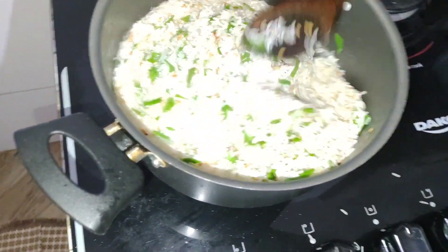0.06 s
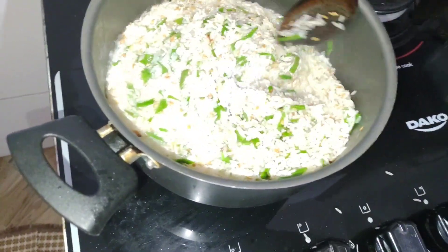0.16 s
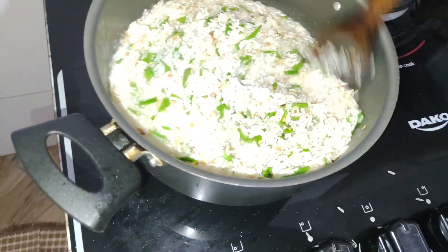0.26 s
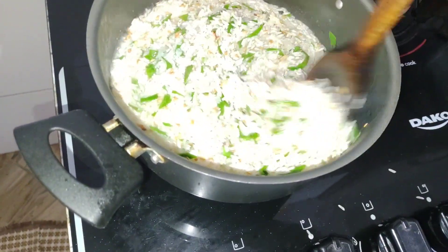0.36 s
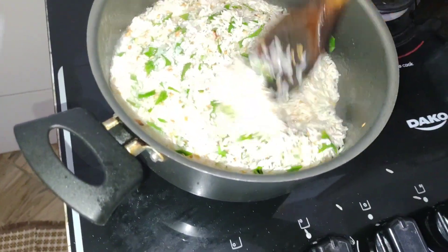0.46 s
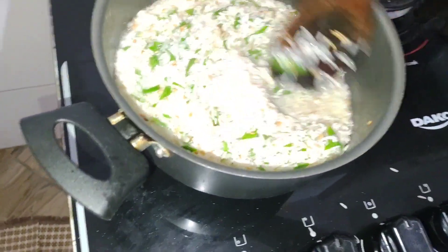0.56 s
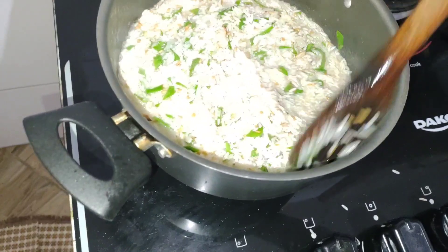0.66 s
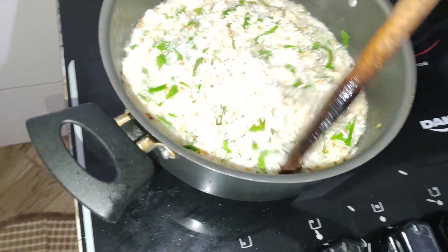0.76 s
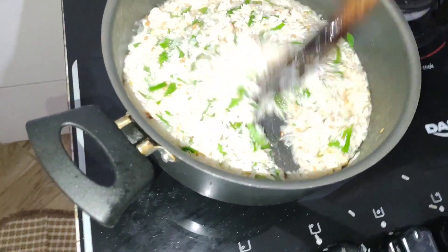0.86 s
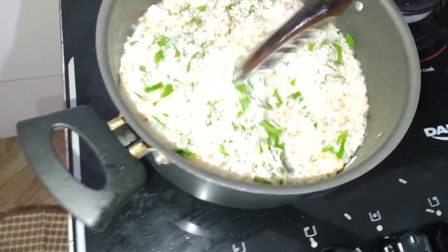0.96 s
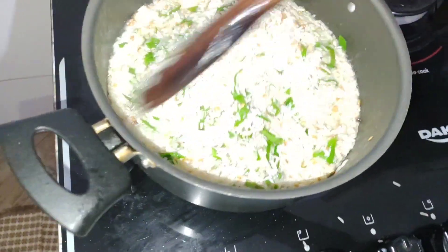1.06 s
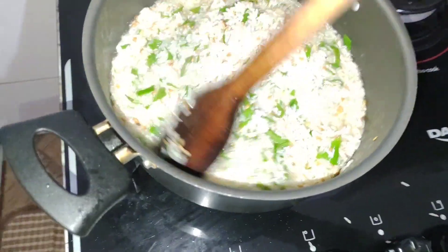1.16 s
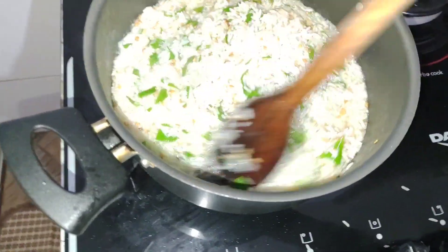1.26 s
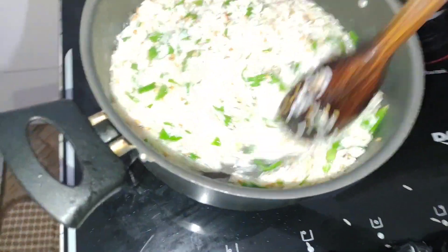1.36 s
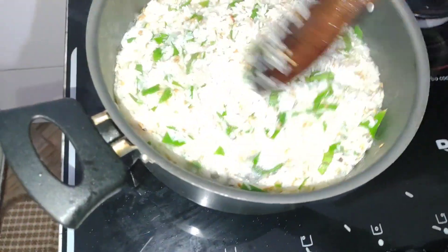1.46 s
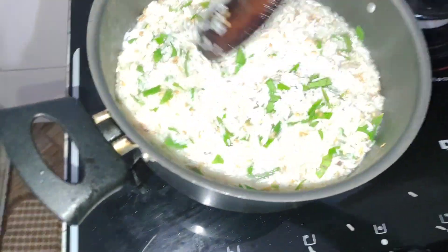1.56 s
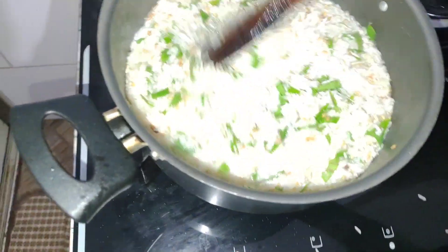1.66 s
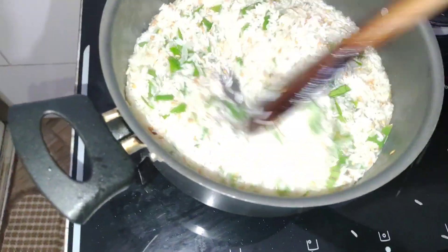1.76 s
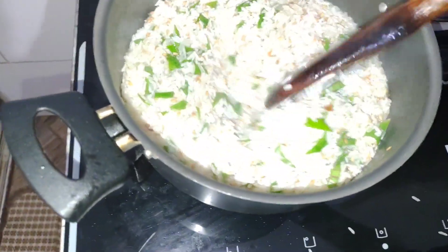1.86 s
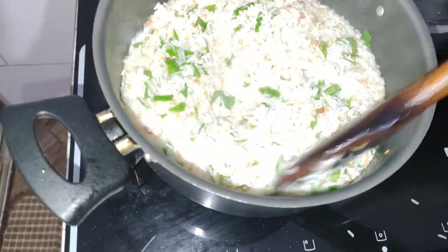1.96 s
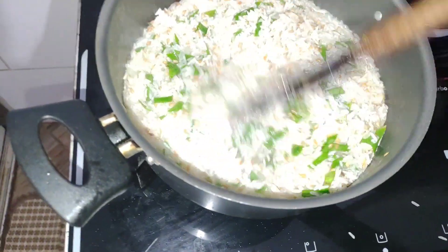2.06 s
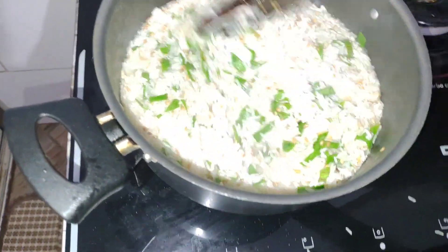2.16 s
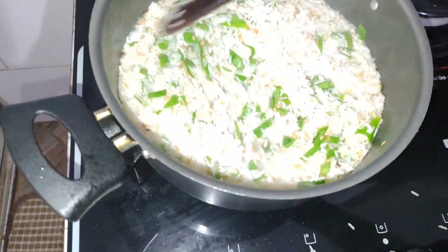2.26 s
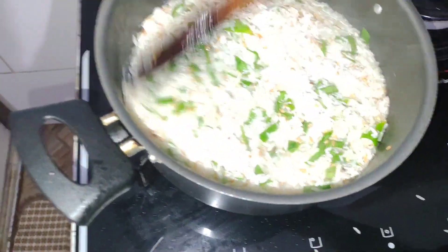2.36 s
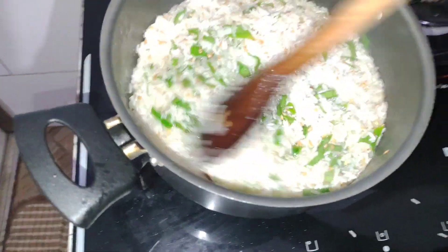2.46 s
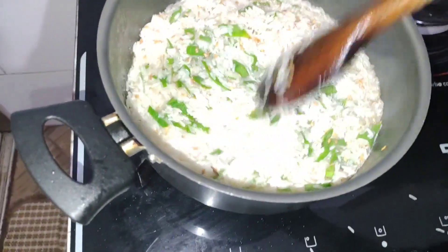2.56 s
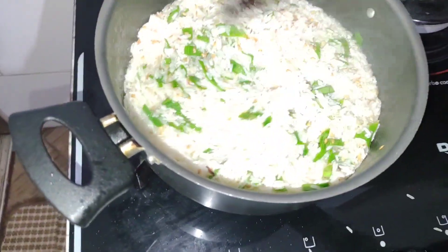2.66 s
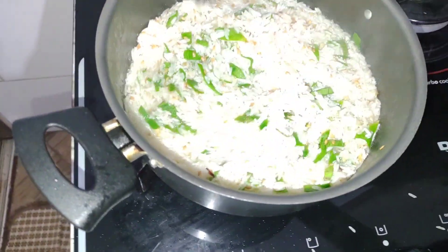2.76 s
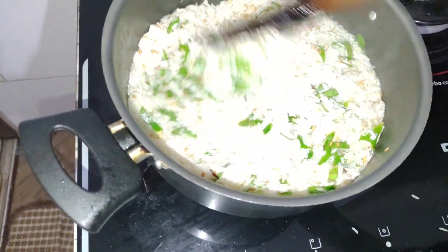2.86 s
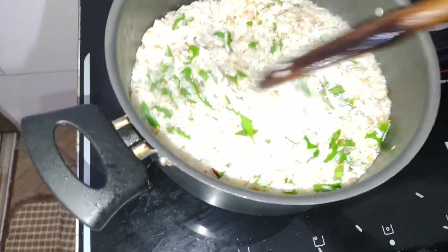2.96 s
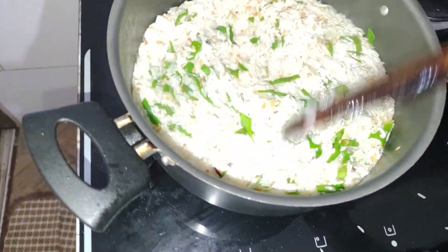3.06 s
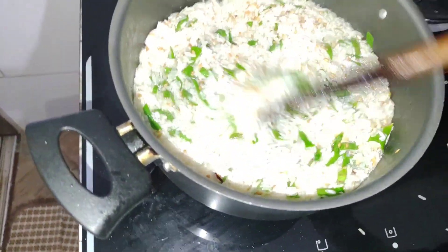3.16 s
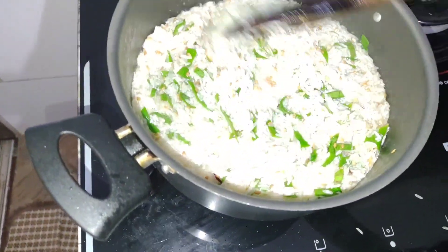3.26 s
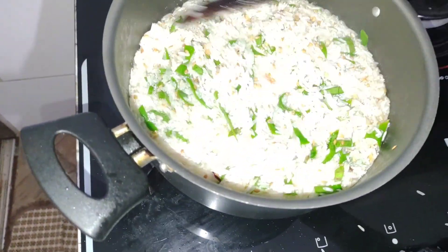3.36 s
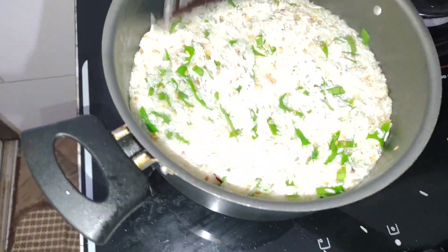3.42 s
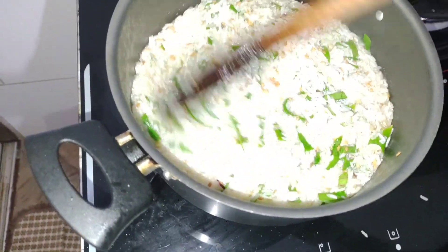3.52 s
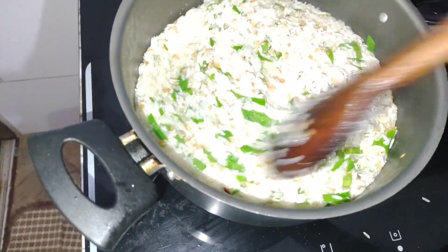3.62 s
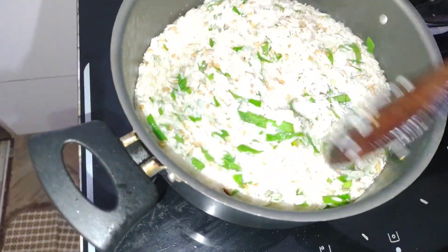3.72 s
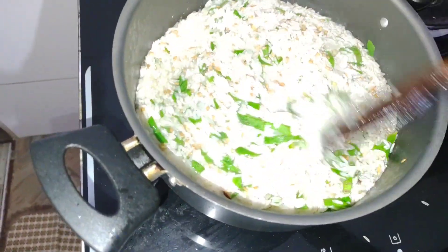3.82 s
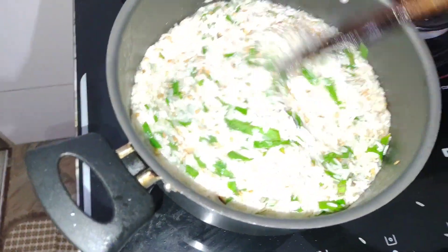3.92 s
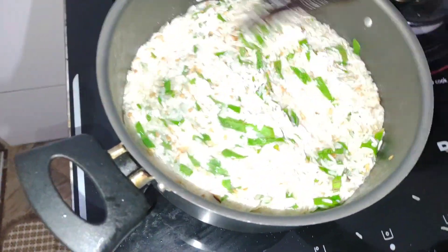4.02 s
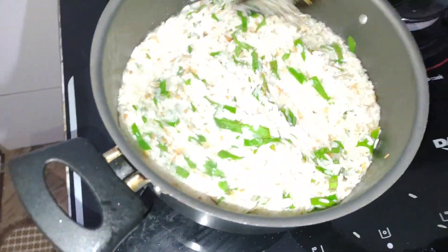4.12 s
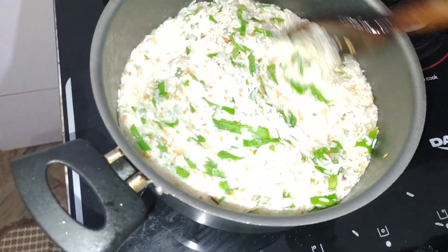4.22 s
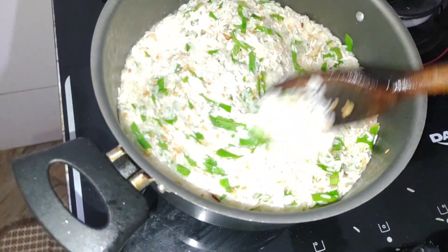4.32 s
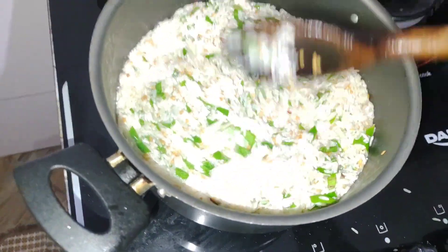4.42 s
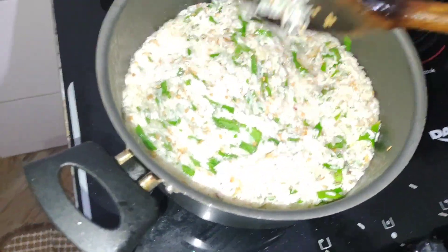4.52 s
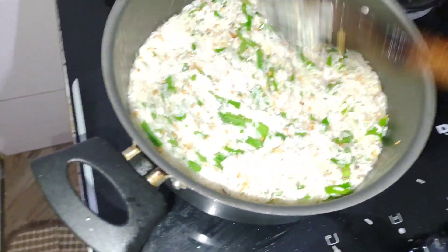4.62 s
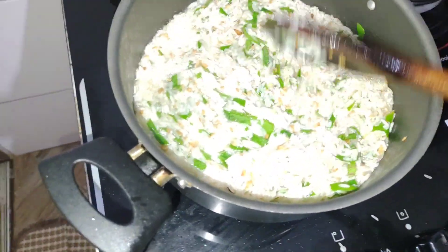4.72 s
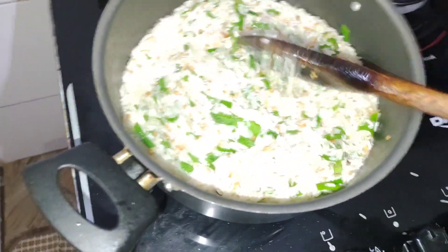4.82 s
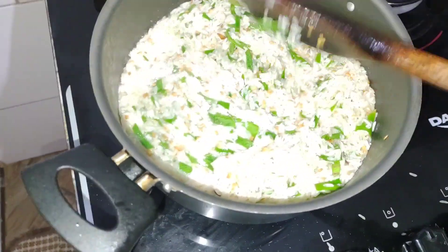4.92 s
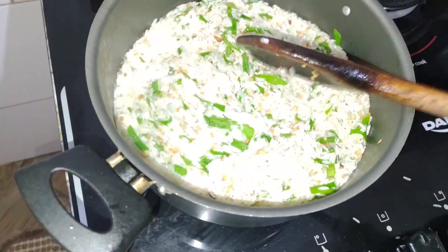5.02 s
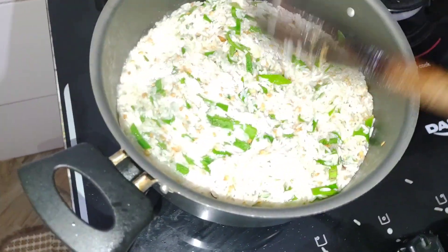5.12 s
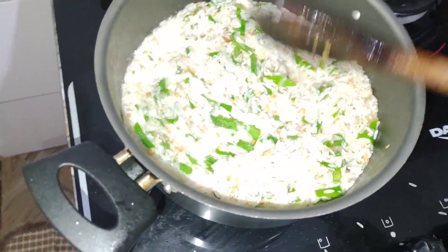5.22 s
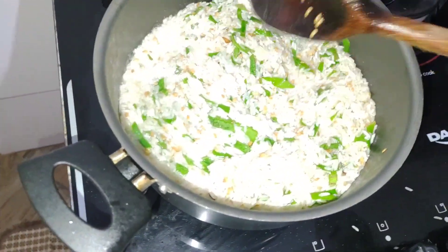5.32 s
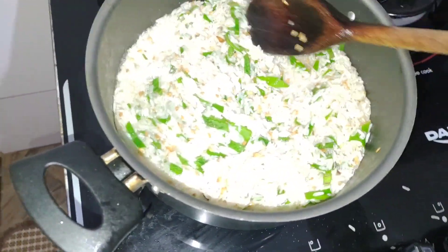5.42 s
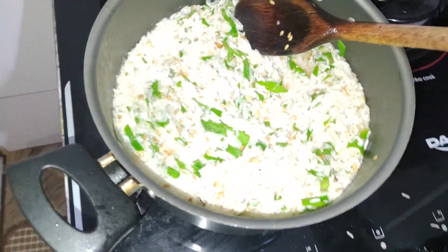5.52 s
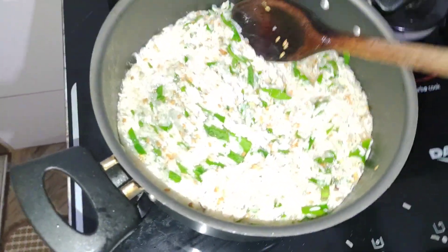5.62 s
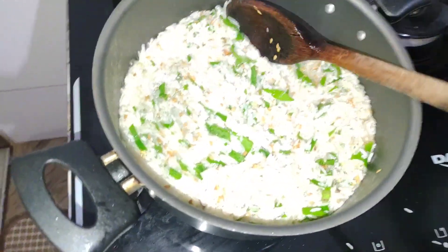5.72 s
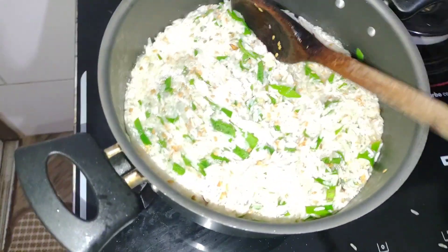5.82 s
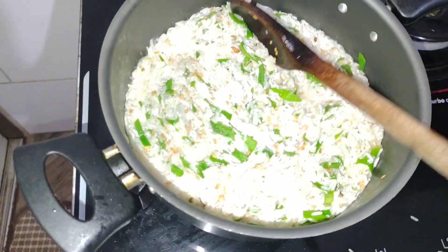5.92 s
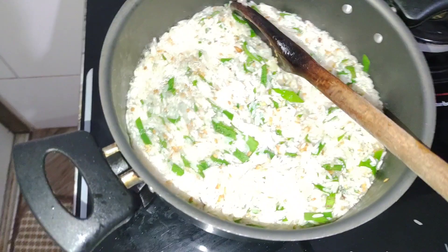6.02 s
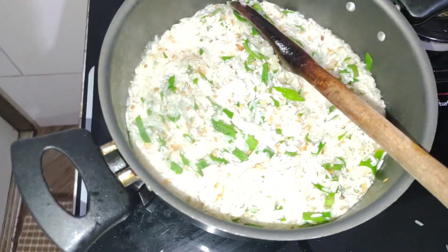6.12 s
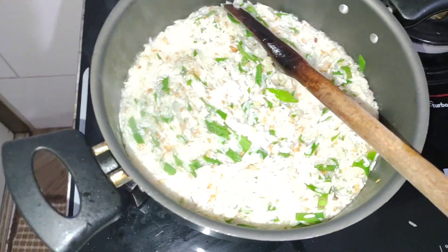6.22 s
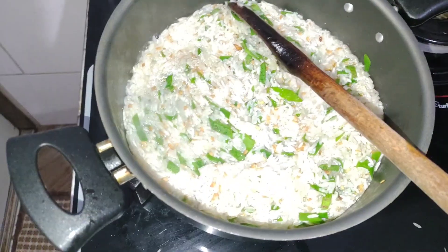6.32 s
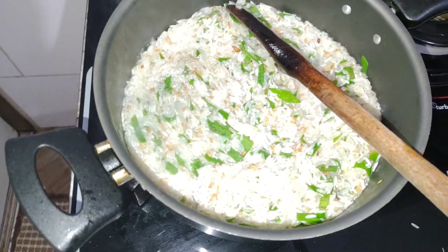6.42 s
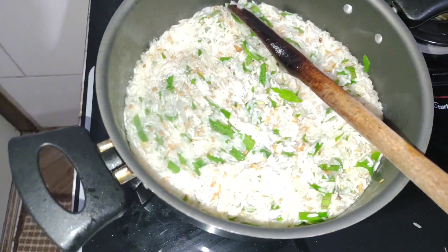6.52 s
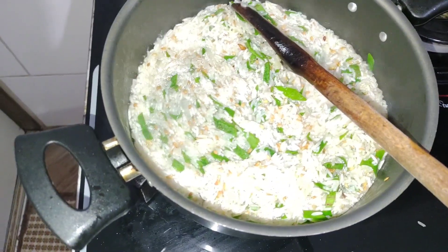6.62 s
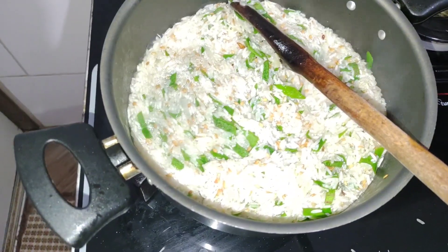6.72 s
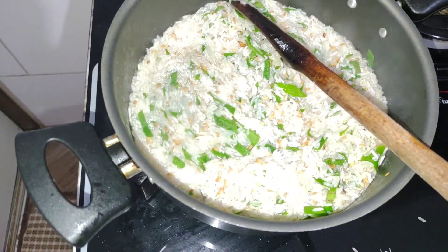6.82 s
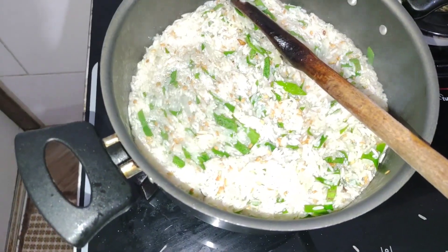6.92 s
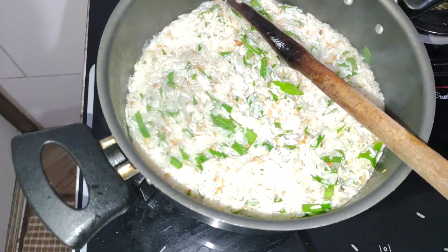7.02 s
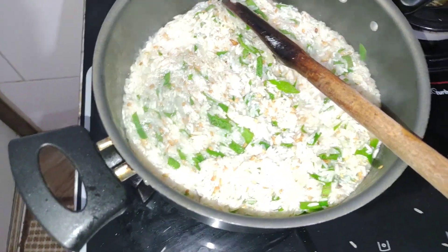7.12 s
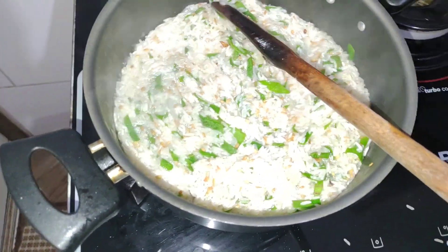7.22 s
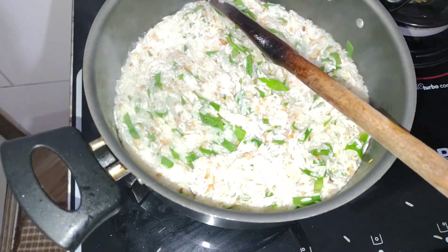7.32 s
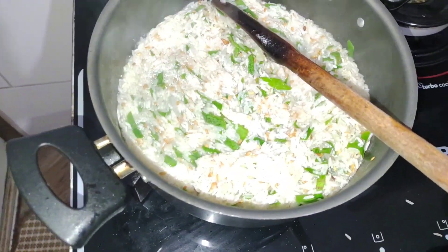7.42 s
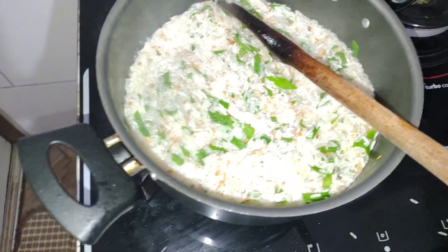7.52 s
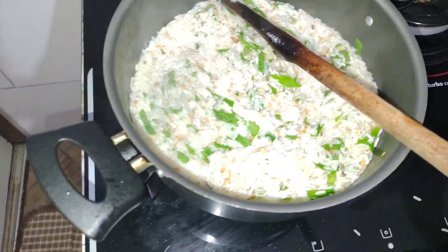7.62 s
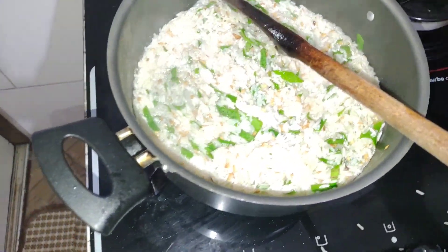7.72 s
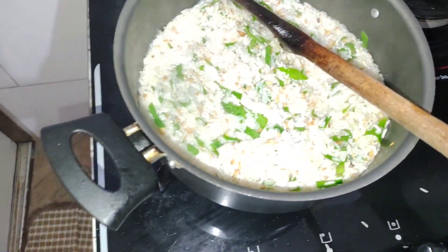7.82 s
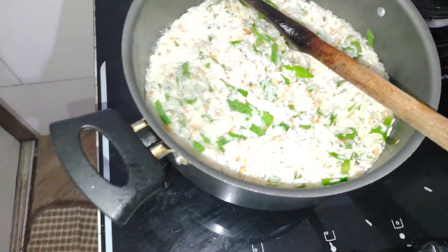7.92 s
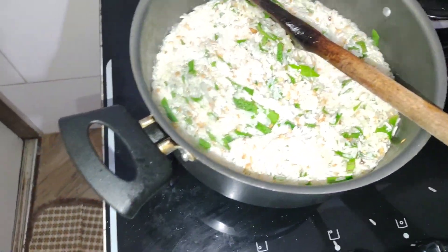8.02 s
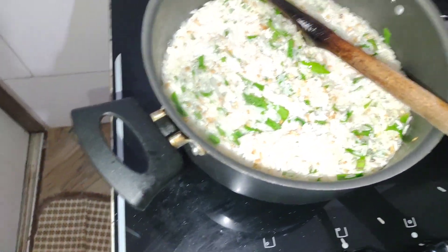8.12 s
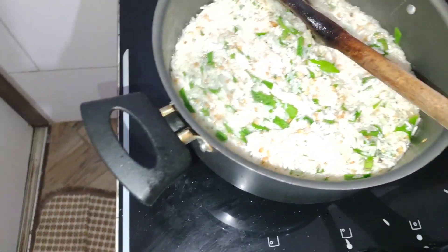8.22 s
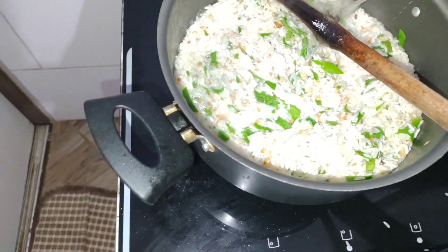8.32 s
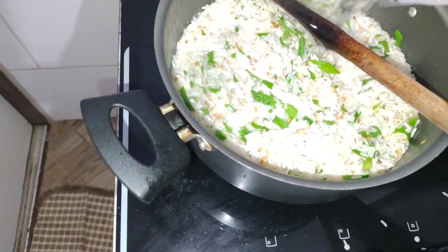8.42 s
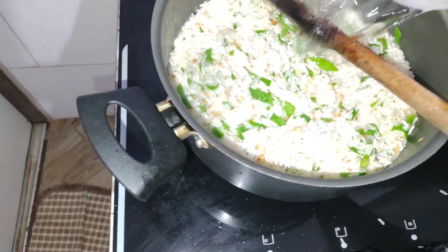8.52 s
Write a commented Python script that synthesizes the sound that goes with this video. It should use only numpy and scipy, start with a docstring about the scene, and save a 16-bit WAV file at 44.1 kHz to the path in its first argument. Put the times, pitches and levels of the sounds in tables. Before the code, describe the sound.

Wet rice simmers faintly in a metal pan while a wooden spoon scrapes and bumps, then raps four times hard on the rim.

```python
"""Wet rice simmers in a deep metal pan on a glass hob: gated grainy noise through air resonances, with
ticks of short decaying sines. A wooden spoon scrapes (coloured grains), shudders the pan (a random low
swing), bumps the wall, is rapped four times on the rim and laid down: each knock rings damped wall modes
and a noise tail from the small kitchen. Below lies a low hum of noise; a narrow-band microphone hears it."""
import sys
import numpy as np
from scipy import signal
from scipy.fft import rfft, irfft
from scipy.io import wavfile
from scipy.ndimage import uniform_filter1d

SR = 44100
rng = np.random.default_rng(int(sys.argv[2]) if len(sys.argv) > 2 else 0)


def store_wav(level_fs):
    """Save 16-bit WAV to argv[1]."""
    pcm = np.round(np.clip(np.atleast_2d(level_fs), -1, 1) * 32767)
    wavfile.write(sys.argv[1], SR, pcm.T.astype(np.int16))


def volts_from_decibels(level):
    """Turn decibel levels (scalar or array-like) into linear amplitude factors."""
    exponent = np.asarray(level, float) / 20
    return 10 ** exponent


N = 378173  # samples


def unit(x):
    """Scale to rms 1."""
    return x / np.sqrt(np.mean(x ** 2))


def curve(rows):
    """Interpolate table columns over t/s, one value per sample."""
    s, *columns = np.transpose(rows)
    t = np.arange(N) / SR
    return [np.interp(t, s, column) for column in columns]


def colour(x, points):
    """Weigh a spectrum by (f/Hz, gain/dB) points, linear in dB over log frequency."""
    hz, db = np.transpose(points)
    f = np.maximum(np.arange(len(x) // 2 + 1) * SR / len(x), 1)
    gain = volts_from_decibels(np.interp(np.log(f), np.log(hz), db))
    return irfft(rfft(x) * gain, len(x))


def resonance(x, hz, width_hz):
    """Two-pole band-pass, gain 1 at the centre."""
    b, a = signal.iirpeak(hz, hz / width_hz, fs=SR)
    return signal.lfilter(b, a, x)


def walk(rate_hz):
    """Random levels held 1 / rate_hz and slewed twice; spread near 1."""
    k = int(SR / rate_hz)
    held = np.repeat(rng.standard_normal(N // k + 1), k)
    slewed = uniform_filter1d(uniform_filter1d(held, k), k)
    return 1.27 * slewed[:N]


def grains(rate_hz, spread_db, share):
    """Smooth noise mixed with many one-sample pops of unequal, but bounded, size."""
    size_db = spread_db * np.minimum(rng.exponential(size=N), 4)
    hits = rng.random(N) < rate_hz / SR
    pops = hits * volts_from_decibels(size_db) * rng.choice([-1, 1], N)
    return unit(rng.standard_normal(N) + share * unit(pops))


def bursts(start_s, hold_s, db, rise_db_per_s, fall_db_per_s):
    """Gain of overlapping events that rise, hold and fall at fixed dB per second; powers add."""
    t = np.arange(0, N, 32) / SR
    since = t - start_s[:, None]
    rise_db = rise_db_per_s * np.maximum(-since, 0)
    fall_db = fall_db_per_s * np.maximum(since - hold_s[:, None], 0)
    gains = volts_from_decibels(db[:, None] - rise_db - fall_db)
    return np.interp(np.arange(N) / SR, t, np.sqrt((gains ** 2).sum(axis=0)))


# hum spectrum: f/Hz, relative level/dB
KITCHEN_SPECTRUM = [(20, 6.5), (40, 14), (60, -11.5), (102, 7.5), (180, -8.5), (290, 0), (420, -5.5),
                    (615, -6.5), (750, -15.5), (1000, -40.5)]
KITCHEN_DB = -65


def kitchen():
    """Low hum of the room and hob: coloured noise, its level drifting slowly."""
    hum = unit(colour(rng.standard_normal(N), KITCHEN_SPECTRUM))
    return volts_from_decibels(KITCHEN_DB + 2 * walk(2.2)) * hum


# spoon against the pan: t/s, level/dB, contact/ms, thump/dB, crack/dB
KNOCKS = [(0.321, -31.5, 0.21, -14, -11.5), (0.42, -32.5, 0.91, -7, -12.5), (0.776, -22.5, 0.33, -36, -19),
          (0.886, -39.5, 0.56, 5.5, -22), (1.222, -24.5, 0.24, -12, -19), (2.447, -34.5, 0.45, -21, -31),
          (3.916, -39, 0.65, -11, -31), (4.164, -45.5, 0.6, -23, -13), (4.786, -12, 0.66, -3.5, -25.5),
          (4.952, -15.5, 0.42, 2.5, -25.5), (5.109, -12, 0.81, 2, -29.5), (5.275, -14, 0.54, 1, -32),
          (5.535, -26, 0.22, -6, -22), (7.115, -29.5, 0.84, -27.5, -33), (7.203, -38, 0.77, -23, -15),
          (7.515, -48.5, 0.48, -23, -8), (8.109, -41, 0.52, -35, -19)]
# pan wall modes: f/Hz, relative level/dB, t60/s
PAN_MODES = [(102, -11.5, 0.5), (159, -26, .4), (195.4, -13, 0.44), (214, -16, 0.16), (280, -14, 0.075),
             (294.6, 4.5, 0.05), (306, -17, 0.62), (381.4, -19.5, 0.51), (431, -21.5, 0.55),
             (489, -15, 0.1), (550.4, -15.5, 0.24), (710, -20.5, 0.28), (798, -5.5, 0.041),
             (854, -13, 0.084), (955, -11.5, 0.058), (1086, -14, 0.037), (1381, -14.5, 0.088),
             (1574, -20.5, 0.12), (1860, -30, 0.034), (2210, -13, 0.027), (2770, -12, 0.025)]
# room tail spectrum: f/Hz, relative level/dB
ROOM_SPECTRUM = [(29, -38.5), (50, -10), (106, -1.5), (204, -11.5), (238, 1), (302, -7.5), (341, -12.5),
                 (391, -6), (599, -16), (688, -18.5), (1410, -27.5), (1790, -37.5), (3000, -44),
                 (3900, -67.5), (6600, -120)]
ROOM_DB, ROOM_T60_S = -10.5, 0.64
LOW_MODE_HZ, LOW_DELAY_S = 600, 0.003094


def knocks():
    """A half-sine push rings the wall; the low modes follow a few ms late, as the whole pan jolts."""
    size = SR // 2
    out, t = np.zeros(N + size), np.arange(size) / SR
    hz, mode_db, t60_s = np.transpose(PAN_MODES)[:, :, None]
    low = hz < LOW_MODE_HZ
    late = np.maximum(t - LOW_DELAY_S * low, 0)
    rings = -np.sin(2 * np.pi * hz * late) * np.exp(-np.log(1000) * late / t60_s)
    room_decay = np.exp(-np.log(1000) * t / ROOM_T60_S) * (1 - np.exp(-t / 0.0018))
    # a free body radiates almost nothing below its lowest mode
    radiation = signal.butter(2, 70, "high", fs=SR, output="sos")
    for s, db, contact_ms, thump_db, crack_db in KNOCKS:
        scatter_db = 1.3 * rng.standard_normal((len(PAN_MODES), 1))
        ring = (volts_from_decibels(mode_db + thump_db * low + scatter_db) * rings).sum(axis=0)
        push = np.sin(np.pi * np.clip(t[:200] * 1000 / contact_ms, 0, 1))
        blow = signal.fftconvolve(ring, push / push.sum())[:size]
        blow = signal.sosfilt(radiation, blow)
        # wet grains fly off the wood
        spray = resonance(rng.standard_normal(size), 2300, 3500)
        crack = volts_from_decibels(crack_db) * spray * np.exp(-t / 0.012)
        # walls and hob give back a dense, dull tail
        dull = unit(colour(rng.standard_normal(size), ROOM_SPECTRUM))
        tail = volts_from_decibels(ROOM_DB + thump_db) * dull * room_decay
        out[int(s * SR):][:size] += volts_from_decibels(db) * (blow + crack + tail)
    return out[:N]


# spoon scraping along the metal: start t/s, hold/s, level/dB
STROKES = [(0.315, 0.23, -48), (0.782, 0.02, -35), (.89, 0.056, -44), (0.99, 0.041, -51.5),
           (1.235, 0.053, -45), (1.776, 0.046, -49.5), (2.166, 0.079, -68), (2.465, 0.041, -49.5),
           (2.562, 0.042, -59), (2.904, 0.074, -54), (3.203, 0.0096, -56), (3.3, 0.045, -57.5),
           (3.442, 0.051, -61), (3.54, 0.19, -53.5), (3.918, 0.1, -45), (4.167, .01, -58),
           (4.288, 0.15, -57.5), (4.56, .04, -61.5), (4.757, .03, -58), (5.606, .04, -56),
           (5.897, 0.12, -59.5), (6.149, 0.019, -57), (6.249, .03, -74), (6.35, .02, -62),
           (7.118, 0.15, -57.5), (7.403, 0.018, -64), (7.51, 0.022, -58), (7.72, .07, -70),
           (7.96, 0.029, -62.5), (8.11, 0.015, -60.5), (8.41, 0.018, -65)]
# scrape spectrum: f/Hz, relative level/dB per Hz
SCRAPE_SPECTRUM = [(88, -42.5), (150, -4.5), (195, -4.5), (289, -0.5), (334, 0.5), (535, -0.5),
                   (661, -13.5), (963, -8), (1500, -11.5), (1950, -57.5), (3300, -120)]
STROKE_RISE_DB_PER_S, STROKE_FALL_DB_PER_S = 1501, 149.5
# grains settling between the strokes: initial level, fade
SETTLE_DB, SETTLE_FADE_DB_PER_S = -59, 1.6


def scrape():
    """Stick-slip of wood on wet metal: coloured grains in strokes over a fading settle."""
    t = np.arange(N) / SR
    start_s, hold_s, db = np.transpose(STROKES)
    strokes = bursts(start_s, hold_s, db, STROKE_RISE_DB_PER_S, STROKE_FALL_DB_PER_S)
    settle = volts_from_decibels(SETTLE_DB - SETTLE_FADE_DB_PER_S * t + 2.1 * walk(12))
    rasp = unit(colour(grains(150, 3.1, 0.84), SCRAPE_SPECTRUM))
    return rasp * np.hypot(strokes, settle) * volts_from_decibels(2.0 * walk(30))


# low shudders through the hob: start t/s, hold/s, level/dB, centre f/Hz
SHUDDERS = [(0.107, 0.02, -54.5, 92.4), (0.324, 0.026, -54, 112.4), (0.41, .04, -56, 122.9),
            (0.532, .03, -60, 119.5), (.71, 0.027, -60, 106.6), (0.786, 0.066, -43, 119.5),
            (0.88, 0.027, -44, 120.4), (1.228, 0.032, -44, 105.3), (1.271, 0.065, -38, 112.5),
            (1.469, 0.0095, -54, 112.4), (1.814, 0.019, -51.5, 86.5), (1.983, 0.031, -62, 90),
            (2.173, 0.096, -61.5, 99.6), (2.474, 0.022, -48.5, 119.8), (2.601, 0.027, -55, 102),
            (2.917, 0.049, -61.5, 106.5), (3.2, 0.021, -50.5, 92), (3.268, .03, -39, 94.5),
            (3.303, .02, -31, 95), (3.331, 0.013, -25, 93.9), (3.4, .02, -42, 94.3),
            (3.442, 0.014, -36, 95), (3.51, 0.065, -46, 100.1), (3.592, .04, -38, 92.2),
            (3.684, 0.016, -48, 94), (3.849, 0.033, -62, 99.6), (3.926, 0.13, -61, 116.7),
            (4.564, 0.034, -62, 109.8), (5.55, 0.048, -47.5, 109.7), (5.947, 0.026, -61, 106.6),
            (6.248, 0.023, -66, 109), (6.854, 0.017, -67, 104), (7.098, .12, -66, 105),
            (7.7, .05, -65, 103), (7.974, 0.021, -62.5, 101), (8.307, 0.061, -60, 85.7)]
SHUDDER_RISE_DB_PER_S, SHUDDER_FALL_DB_PER_S = 700, 201
SHUDDER_REST_DB = -65.5  # initial tremble between shudders


def shudder():
    """Lumpy shudder of the pan on the glass: a low swing of random size and phase, with an overtone."""
    t = np.arange(N) / SR
    start_s, hold_s, db, hz = np.transpose(SHUDDERS)
    phase = 2 * np.pi * np.cumsum(np.interp(t, start_s, hz)) / SR
    swing = walk(110) * np.sin(phase) + walk(110) * np.cos(phase)
    swing = swing + 0.21 * walk(90) * np.sin(2 * phase)
    jolts = bursts(start_s, hold_s, db, SHUDDER_RISE_DB_PER_S, SHUDDER_FALL_DB_PER_S)
    # fades as the grains settle
    rest = volts_from_decibels(SHUDDER_REST_DB - SETTLE_FADE_DB_PER_S * t)
    return unit(swing) * np.hypot(jolts, rest)


# bursting bubbles and snapping grains: t/s, relative level/dB, f/Hz, snap/dB
TICKS = [(0.1883, -34, 2740, -15), (0.3611, -34, 1530, -13), (1.342, -44, 2020, -15),
         (1.4646, -29, 2900, -10), (1.5812, -30, 2390, -29), (1.814, -28.5, 3500, -17),
         (2.156, -37, 3420, -24), (2.1994, -48, 2140, -14), (2.588, -28.5, 1610, -17),
         (2.8904, -34.5, 2720, -2), (2.9786, -30, 1550, -9), (3.2037, -42, 2085, -18),
         (3.425, -48, 3420, -4), (3.8157, -41, 2770, -23), (3.861, -39, 2770, -16), (4.0784, -39, 2820, -6),
         (4.2604, -33.5, 2830, -12), (4.3858, -35, 2750, -28), (4.41, -49, 2480, -10),
         (4.7373, -40, 2770, -13), (4.9223, -31, 2810, -20), (4.9859, -31, 2760, -14),
         (5.1933, -34, 2780, -19), (5.5214, -29, 1580, -26), (5.7678, -38, 2640, -10),
         (6.099, -33.5, 1630, -14), (6.1978, -36.5, 2055, -18), (6.2546, -33, 3380, -8),
         (6.4745, -34, 2630, -20), (6.6322, -45, 2770, -23), (7.063, -38, 2166, -26),
         (7.1897, -44, 2680, -21), (7.4066, -35, 2660, -15), (7.52, -55, 2700, -24),
         (7.6252, -34.5, 3010, -1.5), (7.714, -33.5, 2120, -27)]
# air in the pan and before the microphone: f/Hz, nominal width/Hz, relative level/dB
HOLLOW = [(819, 37, -2.5), (871.4, 110, -1.5), (955.4, 147, 5.5), (1067, 115, -8), (1150, 190, -8),
          (1330, 67, -1.5), (1440, 92, -5.5)]
# sizzle resonances: f/Hz, nominal width/Hz, relative level/dB
SIZZLE = [(2167, 260, -2.5), (2590, 67, -2.5), (2743, 163, 0), (3165, 136, -6), (3384, 98, -3)]
# finest sizzle resonances: f/Hz, nominal width/Hz, relative level/dB
FINEST = [(4076, 140, 0.5), (4866, 360, 2), (5091, 270, 0), (5410, 213, -1.5), (5730, 210, -7.5),
          (7106, 590, -7), (7365, 172, -5.5)]


def ticks():
    """A bubble bursts: a few cycles at its own pitch and a thin bright snap, coloured by the pan's air."""
    size = 400
    out, t = np.zeros(N + size), np.arange(size) / SR
    snap_tone = np.sin(2 * np.pi * 5600 * t) * np.exp(-t / 0.00012)
    for s, db, hz, snap_db in TICKS:
        bubble = np.sin(2 * np.pi * hz * t) * np.exp(-t / 0.00033)
        snap_noise = rng.standard_normal(size) * np.exp(-t / 0.002)
        snap = 3 * snap_tone + 0.26 * snap_noise
        out[int(s * SR):][:size] += volts_from_decibels(db) * (bubble + volts_from_decibels(snap_db) * snap)
    direct = out[:N]
    air = sum(volts_from_decibels(db) * resonance(direct, hz, width_hz) for hz, width_hz, db in HOLLOW + SIZZLE + FINEST)
    return 0.54 * direct + 0.87 * air


# simmer level while the gate is closed: t/s, hollow hiss level/dB, sizzle level/dB,
# finest sizzle level/dB
GATED_SIMMER = [(0, -52.5, -55, -57.5), (1.1, -56, -56.5, -63), (1.44, -60, -56.5, -67),
                (1.9, -56.5, -61.5, -65.5), (3.1, -57.5, -71.5, -71.5), (4.2, -59, -62, -70),
                (5.7, -53.5, -60, -71.5), (6.1, -54.5, -65.5, -75), (6.7, -61, -69, -74.5),
                (7.8, -63.5, -65.5, -74.5), (8.575, -65, -72.5, -81)]
# noise gate opens on the simmer, holds and closes: start t/s, hold/s, hollow hiss level/dB,
# sizzle level/dB, finest sizzle level/dB
GATE_OPENINGS = [(0.136, 0.14, -53, -58, -70), (0.309, 0.29, -49.5, -63, -64.5),
                 (0.65, 0.16, -53, -64, -67), (0.797, 0.3, -49.5, -59, -62),
                 (1.16, 0.0083, -54.5, -55, -57), (1.212, 0.17, -44, -57, -59),
                 (1.467, .39, -46.5, -53.5, -58), (1.941, 0.062, -51.5, -63, -64),
                 (2.158, .12, -52.5, -61, -66.5), (2.441, 0.17, -50.5, -59, -62),
                 (2.798, 0.028, -54, -62, -60), (2.893, 0.095, -47.5, -58, -61),
                 (3.202, .04, -52.5, -64.5, -72), (3.272, 0.032, -51, -62.5, -67.5),
                 (3.324, .04, -50, -63, -65.5), (3.418, 0.015, -55, -73, -63),
                 (3.498, 0.068, -53, -70, -70), (3.586, .11, -58, -60.5, -66.5),
                 (3.818, 0.09, -56, -62, -70), (3.933, 0.14, -48, -63, -62.5),
                 (4.17, 0.0079, -61, -59, -70), (4.267, 0.2, -49.5, -57, -66), (4.534, 0.13, -55, -63, -70),
                 (4.786, 0.814, -56, -65, -68.5), (5.585, 0.14, -54, -61, -67),
                 (5.806, 0.075, -52.5, -62, -68.5), (6.098, 0.041, -53, -64, -68),
                 (6.213, 0.13, -55.5, -64.5, -66), (6.46, 0.024, -56, -60, -71),
                 (6.784, 0.052, -55.5, -65, -68.5), (6.889, 0.022, -55.5, -69, -75),
                 (6.987, 0.016, -59, -72, -76), (7.06, .15, -53, -64.5, -73.5),
                 (7.4, 0.029, -52.5, -65, -68.5), (7.52, 0.015, -55.5, -61.5, -70),
                 (7.606, 0.11, -52.5, -57, -64.5), (7.9, 0.017, -59, -72, -79),
                 (7.95, .09, -57, -63, -67.5), (8.112, 0.022, -60.5, -68.5, -71.5),
                 (8.304, 0.087, -57, -65.5, -74.5)]
GATE_RISE_DB_PER_S, GATE_FALL_DB_PER_S = 1499, 153


def simmer():
    """Fine bubbles excite air resonances that swell one by one; a noise gate opens on each range."""
    fizz = grains(900, 3.3, 0.94)
    start_s, hold_s, *open_levels_db = np.transpose(GATE_OPENINGS)
    ranges = (HOLLOW, SIZZLE, FINEST)
    out = 0
    for peaks, closed_db, open_db in zip(ranges, curve(GATED_SIMMER), open_levels_db):
        body = 0
        for hz, width_hz, peak_db in peaks:
            wide_hz = 1.34 * width_hz
            # applied twice, so the valleys between peaks stay dark
            tone = resonance(resonance(fizz, hz, wide_hz), hz, wide_hz)
            body = body + volts_from_decibels(peak_db + 1.68 * walk(30) + 2.3 * walk(6)) * tone
        openings = bursts(start_s, hold_s, open_db, GATE_RISE_DB_PER_S, GATE_FALL_DB_PER_S)
        gain = np.hypot(volts_from_decibels(closed_db), openings)
        out = out + gain * unit(body) * volts_from_decibels(0.73 * walk(45))
    return out


def scene():
    """All sources, one channel."""
    return (kitchen() + knocks() + scrape() + shudder() + ticks() + simmer())[None]


def top_cut(x):
    """Nothing passes above the cut-off."""
    return signal.sosfilt(signal.butter(12, 15600, fs=SR, output="sos"), x)


BOTTOM_HZ, TOP_HZ, HISS_DB = 43.5, 7620, -95


def record(dry):
    """Narrow-band microphone path: steep top, gentle bottom, then faint white converter hiss."""
    narrow = signal.sosfilt(signal.butter(24, TOP_HZ, fs=SR, output="sos"), dry)
    narrow = signal.sosfilt(signal.butter(2, BOTTOM_HZ, "high", fs=SR, output="sos"), narrow)
    hiss = volts_from_decibels(HISS_DB) * rng.standard_normal(dry.shape)
    return top_cut(narrow + hiss)


dry = scene()
out = record(dry)
store_wav(out)
```